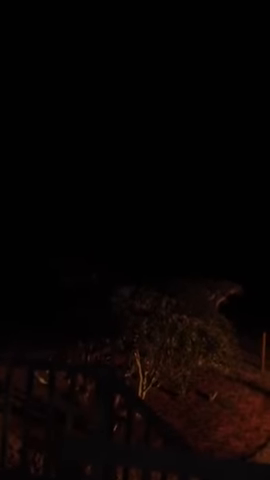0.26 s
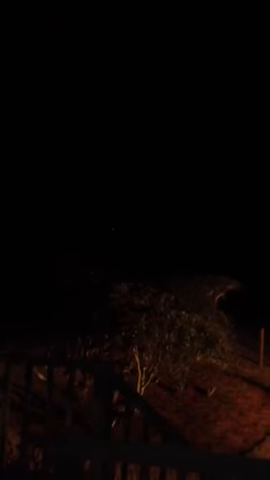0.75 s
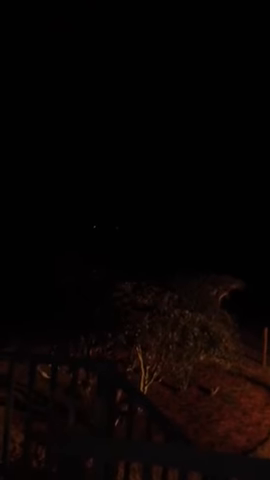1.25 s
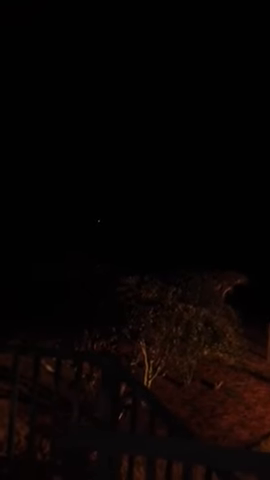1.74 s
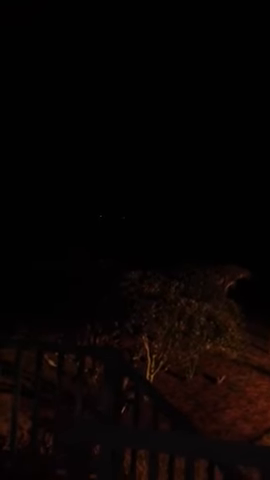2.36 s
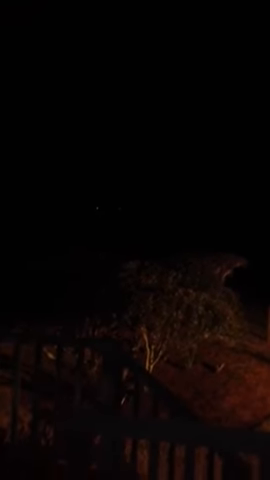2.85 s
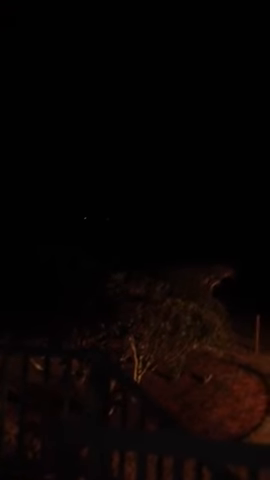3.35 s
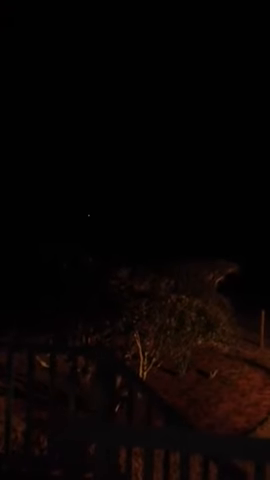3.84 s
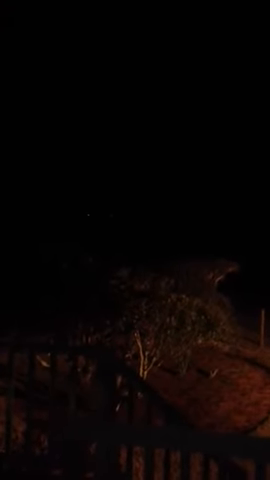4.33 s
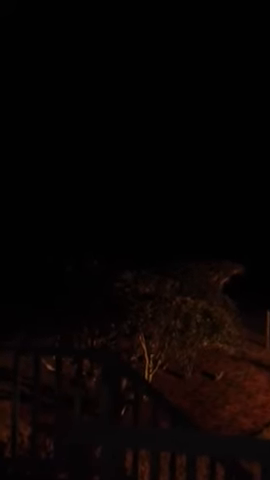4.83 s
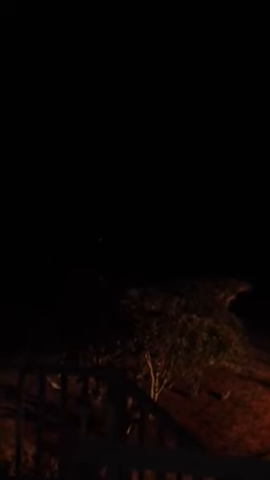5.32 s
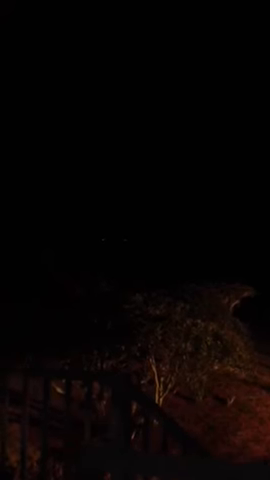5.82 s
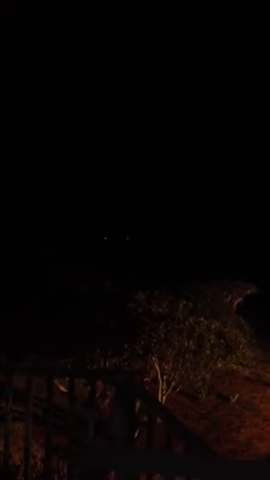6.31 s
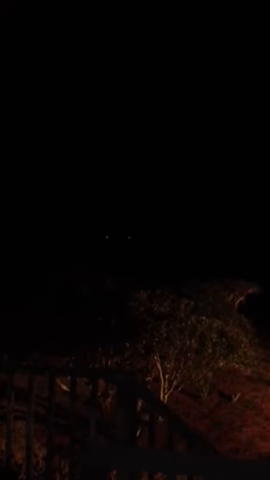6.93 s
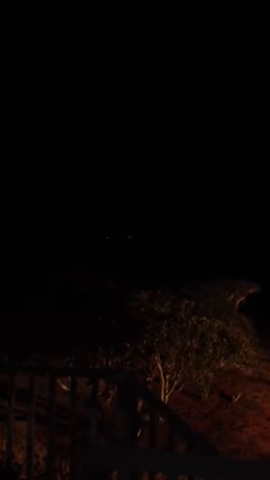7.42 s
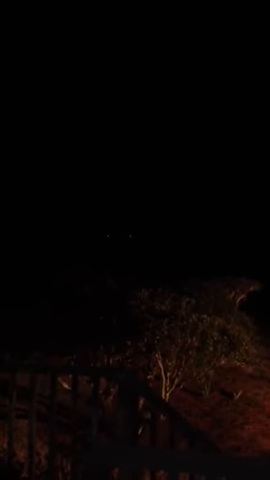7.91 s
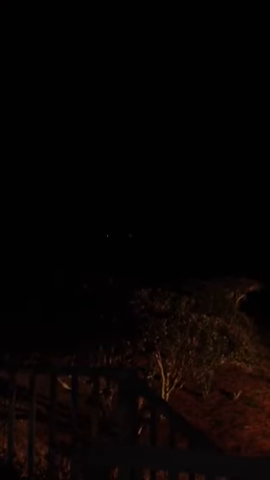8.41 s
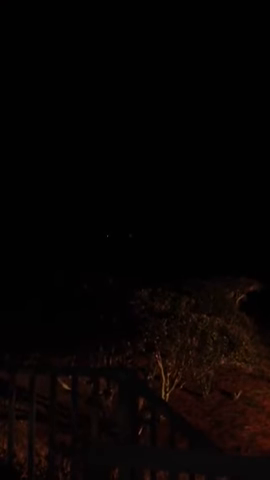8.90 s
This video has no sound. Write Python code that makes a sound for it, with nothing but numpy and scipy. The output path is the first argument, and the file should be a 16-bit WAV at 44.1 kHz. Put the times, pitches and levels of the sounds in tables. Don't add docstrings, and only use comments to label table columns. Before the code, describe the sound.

A group of coyotes heard from a distance at night by a small camera microphone. One animal's wavering howls open, with sparse yips between; piercing held notes follow, then lower howls and rough barks pile up as others join. Toward the end only short yelps and whines remain, fading out. Close by, a motor hums evenly with one tiny tick and a brief thin whine, over soft town rumble and hiss.

```python
import sys
import numpy as np
from scipy import signal
from scipy.fft import rfft, irfft
from scipy.io import wavfile
from scipy.ndimage import uniform_filter1d

SR = 44100
rng = np.random.default_rng(int(sys.argv[2]) if len(sys.argv) > 2 else 0)


def log_audio(samples):
    frames = np.atleast_2d(samples).T
    limited = np.clip(frames, -1, 1)
    pcm = np.round(limited * 32767).astype(np.int16)
    wavfile.write(sys.argv[1], SR, pcm)


def volts_from_db(level):
    exponent = np.asarray(level, float) / 20
    return 10 ** exponent


N = 403956


def walk(n, rate):
    hold = max(int(SR / rate), 1)
    steps = np.repeat(rng.standard_normal(n // hold + 1), hold)
    return 1.45 * uniform_filter1d(uniform_filter1d(steps, hold), hold)[:n]


def add(track, s, sound):
    i = int(s * SR)
    track[i:i + len(sound)] += sound[:N - i]


def tone(hz):
    return np.sqrt(2) * np.sin(2 * np.pi * (np.cumsum(hz) / SR + rng.random()))


def on_log(hz, table):
    table_hz, table_db = np.transpose(table)
    return np.interp(np.log(hz), np.log(table_hz), table_db)


# (pitch [Hz], second partial [dB], third partial [dB])
OVERTONES = [(410, -18, -32), (630, -7.5, -5), (850, -11, -21.5), (1050, -14, -16), (1350, -21, -68),
             (1600, -35.5, -50)]


def overtones(hz, top_db):
    usual_db, purer_db_per_db = -43, 0.48
    pitch, second, third = np.transpose(OVERTONES)
    purer_db = purer_db_per_db * (usual_db - top_db)
    return [np.interp(hz, pitch, part) + purer_db for part in (second, third)]


def sing(tables, mouth_db=0):
    out = np.zeros(N)
    for rows in tables:
        s, hz, db = np.transpose(rows)
        t = np.arange(s[0] - 0.006, s[-1] + 0.017, 1 / SR)
        n = len(t)
        glide = uniform_filter1d(np.interp(t, s, hz), size=600, mode="nearest")
        slide = np.tanh(np.gradient(np.log(glide)) * SR / 2.5)
        pitch = glide * (1 + (0.002 + 0.014 * abs(slide)) * walk(n, 110))
        swell = np.interp(t, s, volts_from_db(db))
        flutter_db = 1 - (0.6 + 1.8 * abs(slide)) * np.minimum(walk(n, 110) ** 2, 4)
        voice = swell * volts_from_db(flutter_db) * tone(pitch)

        usual = np.median(swell)
        overtone_swell = usual * (swell / usual) ** 0.47
        for k, part_db in enumerate(overtones(glide, db.max())):
            multiple = k + 2
            patchy_db = 3 - 2 * walk(n, 25) ** 2 - 3 * walk(n, 110) ** 2
            air_db = -np.clip(multiple * pitch - 3500, 0, None) / 30
            slide_db = 3.5 * slide - 10 * k * abs(slide)
            gain = volts_from_db(part_db + mouth_db + slide_db + patchy_db + air_db)
            hoarse_shake = 1 + 0.012 * walk(n, 158.7)
            voice += overtone_swell * gain * tone(multiple * pitch * hoarse_shake)

        fade = np.clip(np.minimum((t - t[0]) / 0.009, (t[-1] - t) / 0.005), 0, 1)
        add(out, max(t[0], 0), voice * fade)
    return out


# (time [s], pitch [Hz], level [dB])
FIRST_HOWLS = [
    [(0.0, 1030, -41), (0.055, 1070, -49), (0.105, 957, -44.5), (0.22, 845, -43.5), (0.278, 883, -45.5)],
    [(0.28, 989, -45), (0.31, 998, -63), (0.335, 1002, -39.5), (0.37, 1033, -40), (0.392, 1050, -46),
     (0.405, 1046, -38.5), (0.437, 1152, -39), (0.481, 1398, -48)],
    [(0.5, 1367, -44.5), (0.551, 1454, -60), (0.6, 1350, -51), (0.644, 1322, -46), (0.691, 1310, -64)],
    [(1.28, 919, -41), (1.327, 946, -46), (1.437, 848, -47), (1.611, 1234, -43), (1.721, 1366, -82)],
    [(1.786, 613, -69), (1.866, 800, -41.5), (1.906, 932, -79), (1.995, 861, -54), (2.045, 727, -54)],
    [(3.392, 1450, -39), (3.42, 1519, -34.5), (3.46, 1500, -36.5), (3.482, 1546, -41), (3.505, 1543, -35.5),
     (3.55, 1584, -44.5), (3.585, 1538, -40), (3.61, 1110, -43)],
    [(3.422, 716, -73), (3.49, 808, -44.5), (3.537, 1013, -41), (3.57, 1030, -34.5), (3.614, 1014, -52),
     (3.669, 1010, -71)],
    [(3.629, 829, -45.5), (3.689, 670, -66), (3.764, 663, -49.5), (3.831, 749, -46), (3.876, 971, -54.5),
     (3.956, 960, -47.5), (4.003, 1120, -38), (4.06, 1163, -39), (4.1, 960, -45.5)],
    [(4.1, 964, -48), (4.128, 794, -63)],
]
# (time [s], pitch [Hz], level [dB])
SECOND_HOWLS = [
    [(4.18, 552, -71), (4.23, 700, -37.5), (4.26, 646, -51), (4.3, 616, -51.5), (4.395, 609, -53),
     (4.435, 654, -47.5)],
    [(4.437, 753.5, -41.5), (4.492, 862, -37.5), (4.54, 718, -45.5), (4.575, 697.4, -54), (4.605, 749, -39),
     (4.645, 946, -39), (4.695, 866.5, -42), (4.829, 825, -51.5), (4.919, 709, -42)],
    [(4.944, 1057, -66), (4.984, 966, -42), (5.073, 599, -74), (5.13, 608, -47), (5.178, 735, -43.5),
     (5.223, 646, -51.5), (5.345, 675, -53), (5.388, 725, -39), (5.44, 854, -68)],
    [(5.165, 740, -51), (5.21, 890, -45.5), (5.25, 974, -46), (5.305, 1027, -51.5)],
    [(5.502, 962, -45.5), (5.6, 897, -52.5), (5.67, 732, -40), (5.782, 857, -80)],
]
# (time [s], pitch [Hz], level [dB])
THIRD_HOWLS = [
    [(4.238, 784, -37), (4.27, 943, -44), (4.3, 947, -33), (4.333, 925, -40), (4.35, 893, -41.5),
     (4.395, 901, -50)],
    [(4.402, 978, -58), (4.418, 1113, -40.5), (4.445, 1095, -43), (4.462, 990, -52)],
    [(5.72, 993, -50), (5.799, 1081, -47), (5.828, 1029, -37), (5.845, 1025, -35), (5.888, 1013, -38.5),
     (5.9, 1030, -67), (5.945, 1040, -63)],
    [(5.885, 1424, -66), (6.0, 1553, -40), (6.04, 1500, -45), (6.076, 1310, -53.5)],
    [(6.175, 1370, -49), (6.23, 1350, -60), (6.28, 1397, -45), (6.3, 1414, -65), (6.33, 1450, -48.5),
     (6.39, 1377, -65)],
    [(6.43, 1337, -44.5), (6.52, 1254, -72), (6.6, 1350, -47), (6.652, 1407, -49), (6.695, 1356, -47.5)],
    [(6.482, 996, -40), (6.53, 739, -49), (6.583, 556, -89), (6.64, 622.5, -47), (6.74, 614, -48),
     (6.792, 680, -49.5), (6.854, 867, -48)],
    [(6.852, 995, -50), (6.899, 933, -49.5), (6.999, 1023, -46), (7.034, 1017, -33.5), (7.065, 955, -62),
     (7.126, 854, -38), (7.195, 661, -49), (7.283, 713, -50.5), (7.453, 623, -64)],
]


def long_howls():
    return FIRST_HOWLS + SECOND_HOWLS + THIRD_HOWLS


# (time the hold starts [s], hold [s], pitch [Hz], level [dB], scoop [s])
FALSETTO = [
    (2.361, 0.16, 1525, -36.5, 0.011),
    (2.93, 0.23, 1483, -32, 0.079),
    (3.768, .2, 1507, -35, 0.014),
    (7.669, 0.105, 1498, -47.5, 0.1),
    (8.141, 0.086, 1910, -50.5, 0.021),
]


def falsetto():
    scoop_per_s, scoop_from = 13.9, 0.74
    arch = 0.041
    drop_s = 0.028
    tables = []
    for s, hold, hz, db, scoop in FALSETTO:
        start_hz = max(scoop_from, 1 - scoop_per_s * scoop) * hz
        tables.append([
            (s - scoop, start_hz, db - 14),
            (s, (1 - arch) * hz, db - 9.5),
            (s + 0.19 * hold, hz, db),
            (s + hold, (1 - arch / 2) * hz, db - 10.5),
            (s + hold + drop_s, 0.68 * hz, db - 18)])
    return tables


def short_calls(rows, shape):
    tables = []
    for s, length, hz, end_hz, db in rows:
        tables.append([(s + u * length, hz + step * (end_hz - hz), db + under_db)
                       for u, step, under_db in shape])
    return tables


# (time [s], length [s], first pitch [Hz], top pitch [Hz], level [dB])
YIPS = [(.85, 0.12, 1760, 1656, -72), (.72, 0.18, 1160, 1373, -52.5), (1.185, 0.15, 482, 817, -49),
        (1.24, 0.057, 1904, 2304, -52.5), (1.821, 0.11, 1186, 1360, -56), (1.95, .15, 1184, 1138, -51),
        (3.18, 0.043, 1520, 1680, -50.5), (4.218, 0.13, 1302, 1347, -52.5), (6.076, 0.075, 660, 889, -47),
        (6.373, 0.09, 632, 820, -48.5), (6.99, 0.075, 477, 683, -49.5), (7.81, 0.13, 1315, 1474, -56),
        (8.575, 0.12, 863, 1128, -52), (8.695, 0.079, 1165, 1258, -52)]
# (share of length [0-1], share of pitch step [0-1], level against the call [dB])
YIP_SHAPE = [(0, 0.029, -20), (0.451, 0.92, 8), (1, 0.81, -49)]


def yips():
    return short_calls(YIPS, YIP_SHAPE)


# (time [s], length [s], first pitch [Hz], last pitch [Hz], level [dB])
CLIMBS = [(1.177, 0.14, 1001, 1031, -54), (1.4, 0.18, 1793, 1156, -74), (2.205, 0.082, 936, 1230, -55),
          (2.29, 0.074, 753, 1095, -48.5), (2.54, 0.088, 937, 1260, -61.5), (2.785, 0.054, 754, 958, -54),
          (2.83, 0.082, 873, 1107, -51.5), (3.14, 0.039, 827, 916, -50.5), (3.35, 0.057, 735, 1068, -46.5),
          (5.175, 0.04, 2200, 2550, -67), (5.05, 0.106, 1063, 1260, -66), (5.7, 0.066, 1313, 1475, -50),
          (5.75, 0.064, 1565, 1600, -58), (7.81, 0.098, 681, 897, -48), (7.835, 0.064, 856, 1038, -55.5),
          (8.027, 0.047, 787, 836, -47), (8.06, 0.07, 849, 934, -47.5), (8.07, 0.031, 970, 970, -52.5),
          (8.29, 0.049, 786, 917, -45.5), (7.99, 0.067, 1274, 1525, -62), (8.245, 0.038, 745, 795, -50),
          (9.089, 0.054, 1045, 1093, -67.5)]
# (share of length [0-1], share of pitch step [0-1], level against the call [dB])
CLIMB_SHAPE = [(0, 0.041, -3.5), (0.398, .55, 8.5), (0.801, .9, 10), (1, 0.86, -30)]


def climbs():
    return short_calls(CLIMBS, CLIMB_SHAPE)


# (time [s], length [s], first pitch [Hz], last pitch [Hz], level [dB])
WHINES = [(0.0, 0.068, 1600, 1498, -51), (.27, 0.052, 1560, 1474, -57), (.72, 0.14, 897, 630, -67.5),
          (1.25, 0.033, 1335, 1350, -49), (1.43, 0.031, 880, 759, -49), (1.646, 0.095, 417, 410, -60),
          (2.63, 0.066, 1710, 1500, -50), (3.175, 0.084, 1070, 1118, -43.5), (4.946, 0.051, 680, 638, -51),
          (5.31, 0.1, 1208, 1236, -49), (5.408, 0.1, 1044, 1015, -40.5), (6.149, 0.031, 1815, 1765, -40.5),
          (6.178, 0.02, 1030, 927, -41), (7.041, 0.041, 1350, 1350, -49), (7.214, 0.019, 720, 880, -45),
          (7.05, 0.047, 899, 916, -43), (7.48, 0.075, 1050, 988, -64), (8.46, 0.029, 1035, 1002, -59),
          (7.293, 0.047, 1057, 963, -43), (7.64, 0.1, 714, 757, -63.5), (7.929, 0.054, 1050, 950, -54),
          (7.77, 0.13, 850, 881, -52), (8.11, 0.087, 938, 968, -53), (4.632, 0.039, 1490, 1453, -46.5),
          (4.635, 0.014, 1046, 1050, -49), (8.27, 0.19, 1500, 1405, -55), (8.341, 0.08, 1086, 992, -43),
          (8.695, 0.042, 1025, 950, -53), (8.76, 0.074, 894, 790, -60), (8.975, 0.028, 878, 960, -64),
          (8.91, 0.089, 1270, 1240, -68)]
# (share of length [0-1], share of pitch step [0-1], level against the call [dB])
WHINE_SHAPE = [(0, 0.18, -0.35), (0.452, 0.46, 2), (0.999, 0.98, -1.5)]


def whines():
    return short_calls(WHINES, WHINE_SHAPE)


# (time [s], length [s], first pitch [Hz], top pitch [Hz], level [dB])
YELPS = [
    (.663, 0.15, 940, 1222, -52),
    (2.775, 0.041, 1217, 1660, -47.5),
    (7.89, 0.065, 1050, 1090, -59.5),
    (8.03, 0.04, 1070, 1080, -67),
    (8.09, 0.076, 1056, 1050, -69),
    (8.925, 0.069, 836, 882, -77),
]
# (time [s], pitch [Hz], level [dB])
OPEN_CALLS = [
    [(.075, 1118, -50), (.13, 1340, -44.5), (.165, 1414, -44.5), (.21, 1340, -51), (.245, 1076, -57)],
    [(.272, 806, -64), (.29, 836, -55), (.33, 811, -56), (.365, 817, -70)],
    [(.3, 980, -66), (.38, 1050, -63), (.43, 1117, -48.5), (.47, 1132, -49), (.5, 1070, -62)],
    [(3.735, 944, -51), (3.75, 1020, -45), (3.762, 1390, -47), (3.8, 1476, -44)],
    [(4.522, 1067, -56), (4.555, 1033, -34.5), (4.6, 1027, -46), (4.615, 1050, -47), (4.645, 1020, -67)],
    [(4.6, 767, -60), (4.635, 904, -54), (4.665, 938, -42), (4.685, 970, -60)],
    [(5.618, 860, -53), (5.645, 994, -45.5), (5.67, 1032, -51)],
    [(5.765, 1050, -55), (5.8, 1078, -39), (5.86, 1017, -53), (5.91, 988, -51)],
    [(6.93, 960, -70), (7.0, 1020, -61), (7.055, 1020, -56)],
]


def open_mouthed():
    return short_calls(YELPS, YIP_SHAPE) + OPEN_CALLS


# (frequency [Hz], level [dB])
THROAT = [(700, -16.5), (1500, 1), (2500, -8.5), (3200, -18.5), (3800, -17.5)]


def rasp(n):
    hz = np.maximum(np.arange(n // 2 + 1) * SR / n, 1)
    edge_db = -np.clip(650 - hz, 0, None) / 12 - np.clip(hz - 3600, 0, None) / 25
    noise = irfft(rfft(rng.standard_normal(n)) * volts_from_db(on_log(hz, THROAT) + edge_db), n)
    return noise / noise.std()


# (time [s], length [s], level [dB], top pitch [Hz])
YAPS = [(0, 0.0896, -47, 793), (0.264, 0.16, -53, 795), (1.214, 0.08, -53.5, 746), (2.284, 0.12, -53, 994),
        (2.776, 0.078, -55, 850), (3.14, 0.085, -60, 850), (3.345, 0.04, -54, 760),
        (3.371, 0.052, -43, 850), (3.588, 0.059, -58, 986), (3.973, 0.19, -55.5, 850),
        (4.218, 0.077, -50, 680), (4.405, 0.13, -50, 786), (4.628, 0.072, -56.5, 681),
        (4.856, 0.16, -51.5, 763), (5.376, 0.14, -50.5, 780), (5.631, 0.038, -52, 774),
        (5.698, 0.1, -51.5, 798), (6.092, 0.1185, -50.5, 850), (6.39, 0.16, -54.5, 780),
        (6.774, 0.16, -54, 783), (7.024, 0.13, -57.5, 672), (7.209, 0.11, -55, 789),
        (7.532, 0.14, -64, 795), (7.838, 0.14, -54, 850), (8.037, 0.11, -49.5, 924),
        (8.267, 0.14, -50, 850)]


def yaps():
    out = np.zeros(N)
    for s, length, db, top_hz in YAPS:
        n = int(1.3 * length * SR)
        u = np.arange(n) / n
        jitter = 1 + (0.012 + 0.14 * length) * walk(n, 230)
        pitch = top_hz * (1 - 0.4 * (u - 0.6) ** 2) * jitter
        voice = volts_from_db(-5) * rasp(n)
        for k in np.arange(2, 10) / 2:
            half_db = -8.0 * (k % 1 > 0)
            air_db = -np.clip(k * pitch - 3600, 0, None) / 25
            flutter_db = 4.2 * walk(n, 110.3)
            gain = volts_from_db(on_log(k * pitch, THROAT) + half_db + air_db + flutter_db)
            voice = voice + gain * tone(k * pitch)
        throb = volts_from_db(2.2 * walk(n, 180))
        swell = np.sin(np.pi * u ** 0.56) ** 0.97
        add(out, s, voice * throb * swell * volts_from_db(db))
    return out


# (time [s], length [s], top pitch [Hz], level [dB], roughness [about 0-1])
BARKS = [(0, .11, 790, -55, 0.33), (.26, .1, 792, -56, 0.74), (1.024, 0.15, 899, -54.5, 0.2),
         (1.811, 0.23, 914, -57.5, 0.64), (4.435, 0.1, 824, -40.5, 1.05), (4.867, .125, 799, -38, 0.21),
         (5.385, 0.17, 770, -55, 0.64), (5.613, 0.17, 779, -44, 0.25), (6.395, 0.11, 789, -42, 0.34),
         (6.769, 0.14, 763, -44.5, 0.89), (7.214, 0.093, 780, -44.5, 0.88)]
# (multiple of the pitch, level [dB])
BARK_PARTIALS = [(1, -10.5), (2, -1), (3, -12.5), (4, -19)]


def barks():
    top_at, bend = 0.62, 0.68
    out = np.zeros(N)
    for s, length, top_hz, db, rough in BARKS:
        n = int(length * SR)
        u = np.arange(n) / n
        jitter = 1 + 0.025 * rough * walk(n, 200)
        pitch = top_hz * (1 - bend * (u - top_at) ** 2) * jitter
        voice = np.zeros(n)
        for k, part_db in BARK_PARTIALS:
            flutter_db = (2 + 2.7 * rough) * walk(n, 116.6)
            voice += volts_from_db(part_db + flutter_db) * tone(round(k) * pitch)
        swell = np.sin(np.pi * u ** 1.07) ** 0.72
        add(out, s, voice * swell * volts_from_db(db))
    return out


def yard(x):
    t = np.arange(SR // 2) / SR
    sparse = rng.standard_normal(len(t)) * (rng.random(len(t)) < 0.02)
    decay = volts_from_db(-60 * t / 0.54)
    echoes = sparse * decay * np.clip(t / 0.023, 0, 1)
    echoes /= np.sqrt(np.sum(echoes ** 2))
    return x + volts_from_db(-15) * signal.fftconvolve(x, echoes)[:N]


# (frequency [Hz], level [dB])
HUM = [
    (98, -77),
    (172, -74.5),
    (296, -63),
]


def machine():
    out = np.zeros(N)
    for hz, db in HUM:
        out += volts_from_db(db + 0.72 * walk(N, 16.0)) * tone(hz * (1 + 0.0041 * walk(N, 3)))
    return out


# (frequency [Hz], level [dB])
SQUEAK = [
    (2290, -71),
    (4290, -77),
    (6422, -83),
]


def camera():
    out = np.zeros(N)
    whine_s = 0.33
    u = np.arange(int(whine_s * SR)) / (whine_s * SR)
    whine = sum(volts_from_db(db) * tone(hz + 0 * u) for hz, db in SQUEAK)
    add(out, 0.93, whine * np.sin(np.pi * u) ** 0.51)
    ring = signal.butter(2, (3900, 8000), "bandpass", fs=SR, output="sos")
    burst = rng.standard_normal(800) * np.exp(-np.arange(800) / 200.0)
    add(out, 0.383, volts_from_db(-49.5) * signal.sosfilt(ring, burst))
    return out


# (frequency [Hz], density [dB per Hz])
NIGHT = [(18, -57), (30, -16), (85, -5), (241, -4.5), (297, -3.5), (417, -9), (864, -10.5), (1380, -11.5),
         (2940, -26), (15200, -30.5)]


def night():
    hz = np.maximum(np.arange(N // 2 + 1) * SR / N, 1)
    noise = irfft(rfft(rng.standard_normal(N)) * volts_from_db(on_log(hz, NIGHT)), N)
    return noise / noise.std() * volts_from_db(-58.5 + 0.25 * walk(N, 1.5))


def scene():
    pure_calls = long_howls() + falsetto() + yips() + climbs() + whines()
    pack = sing(pure_calls) + sing(open_mouthed(), mouth_db=9) + yaps() + barks()
    return (yard(pack) + night() + machine() + camera())[None]


def band_limit(x):
    return signal.sosfilt(signal.butter(12, 15320, fs=SR, output="sos"), x)


def record(dry):
    return band_limit(dry)


dry = scene()
out = record(dry)
log_audio(out)
```